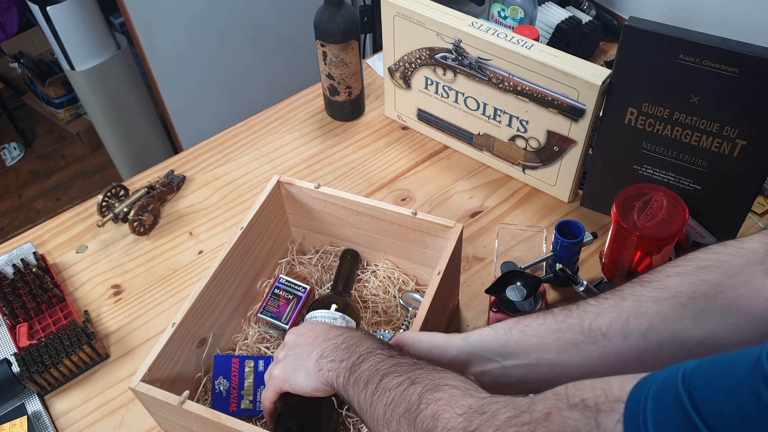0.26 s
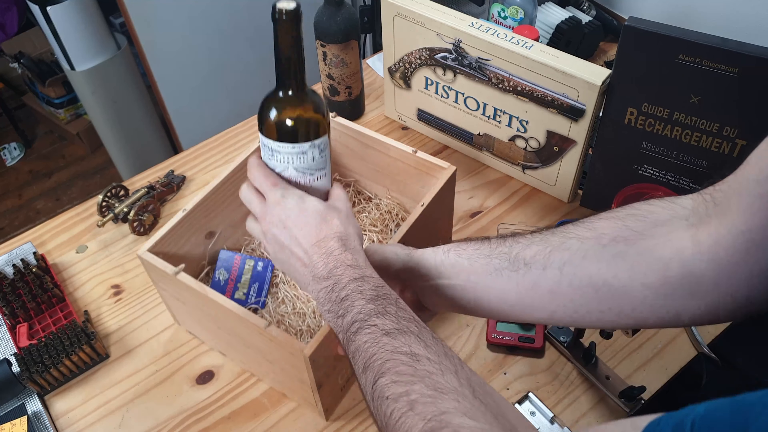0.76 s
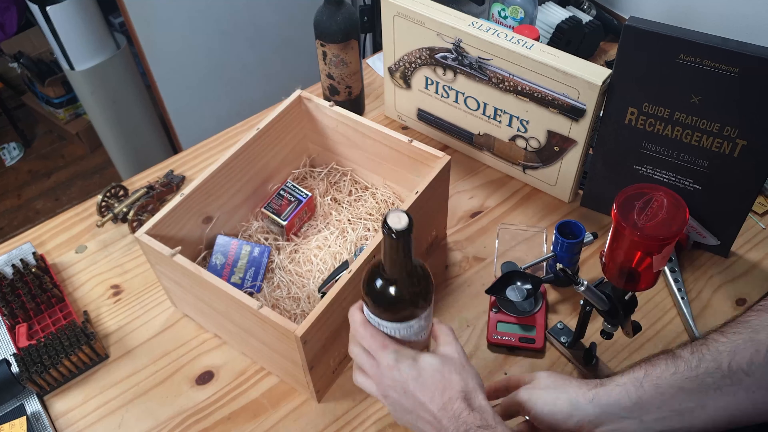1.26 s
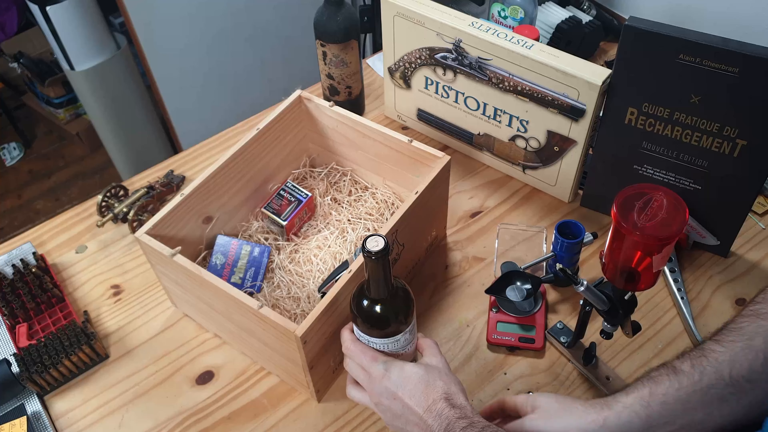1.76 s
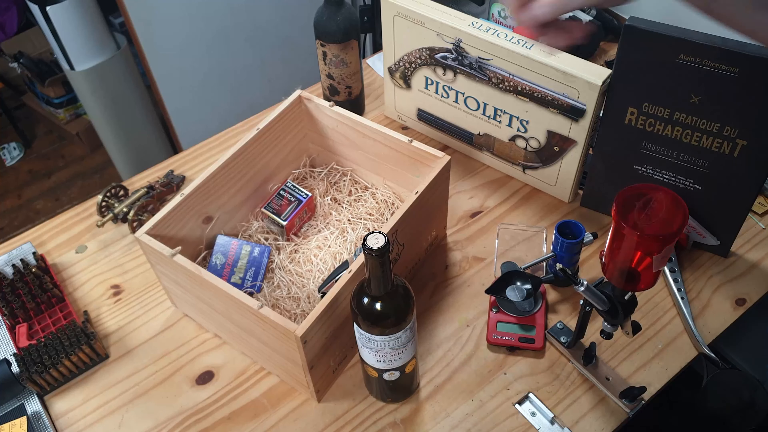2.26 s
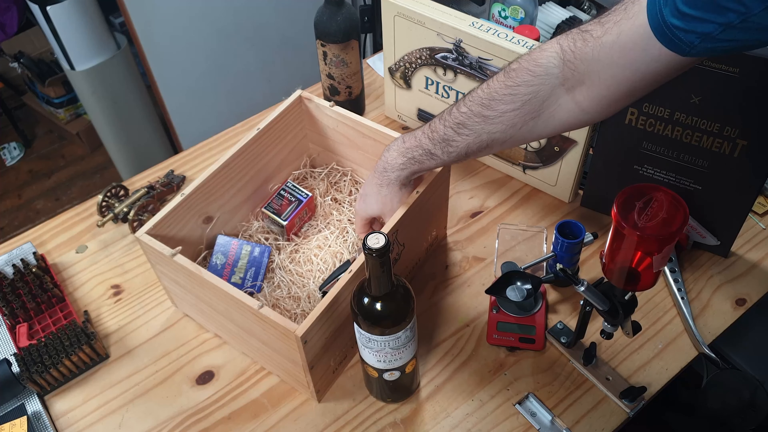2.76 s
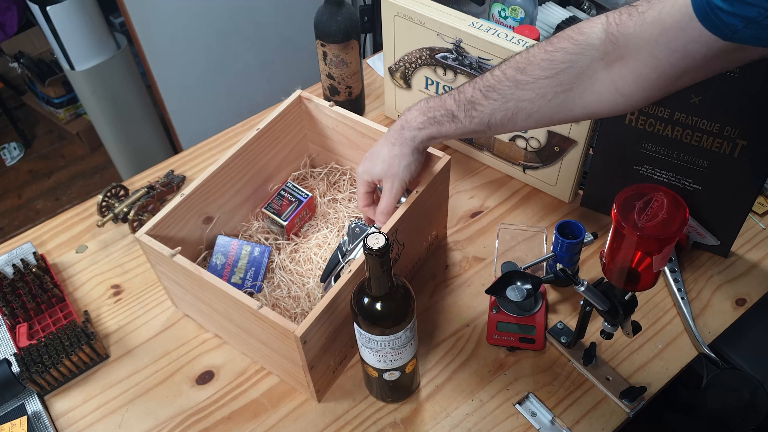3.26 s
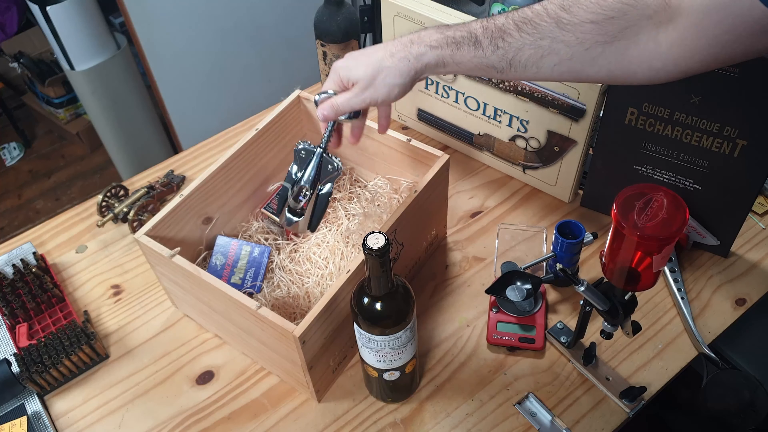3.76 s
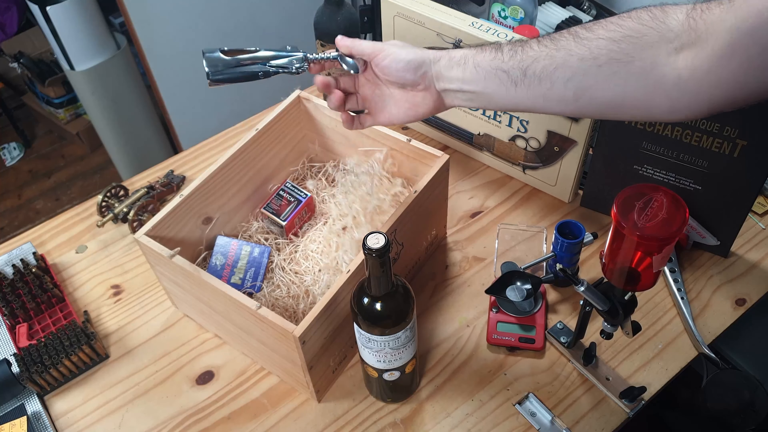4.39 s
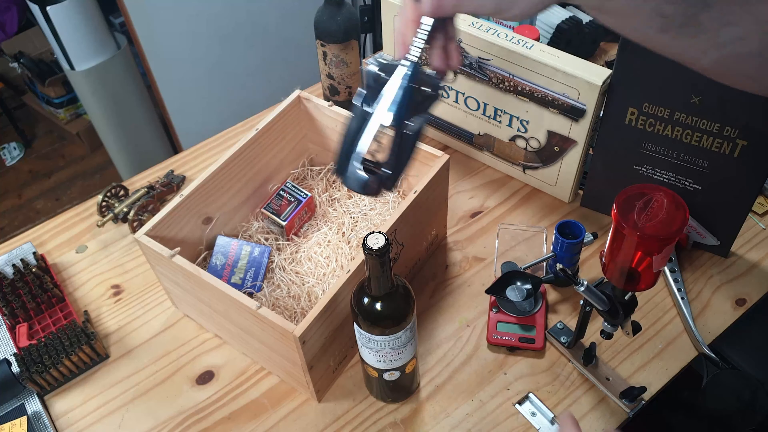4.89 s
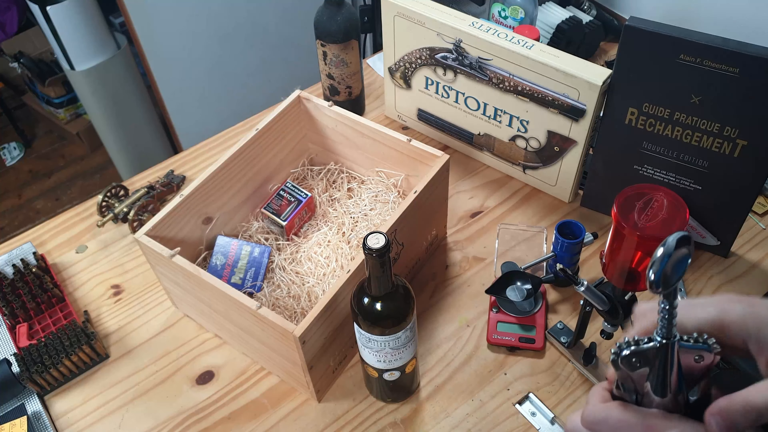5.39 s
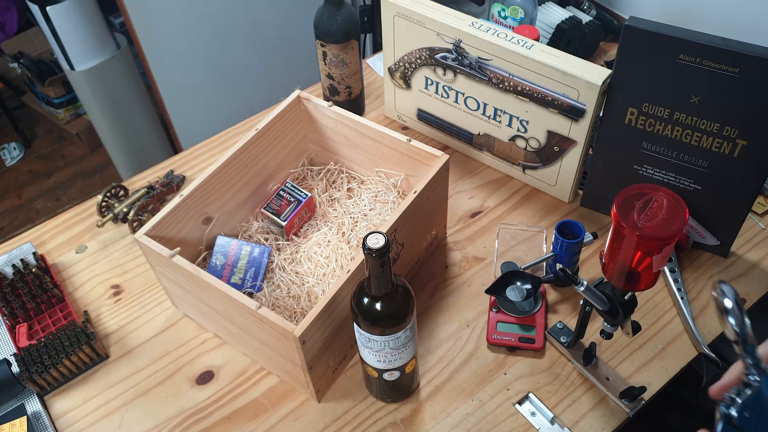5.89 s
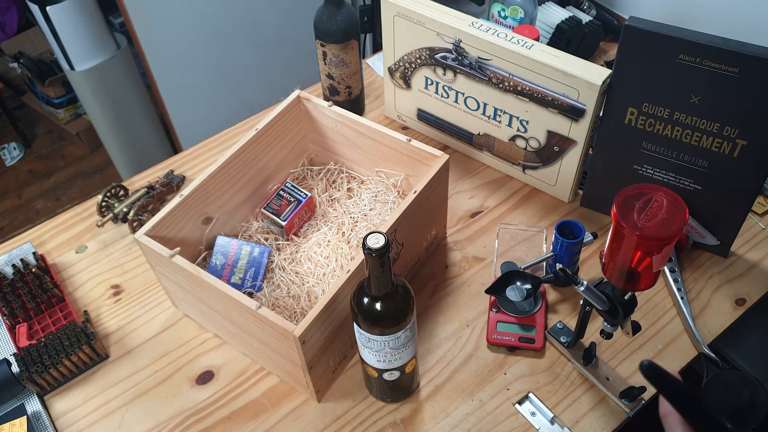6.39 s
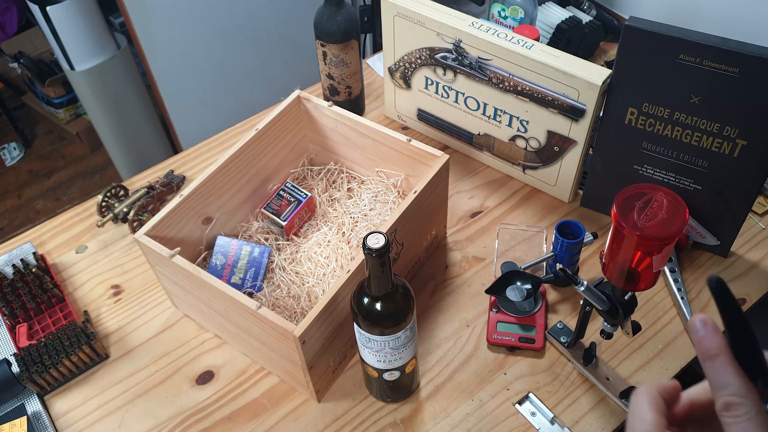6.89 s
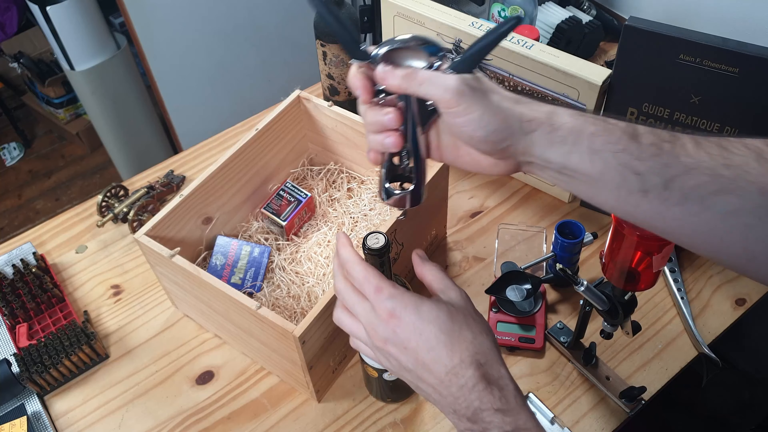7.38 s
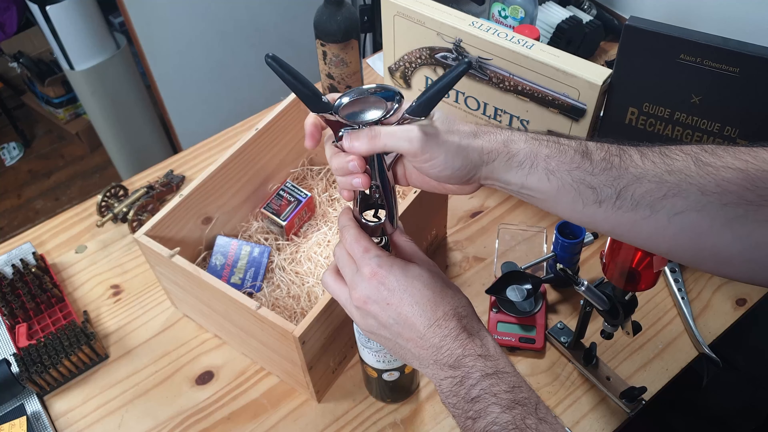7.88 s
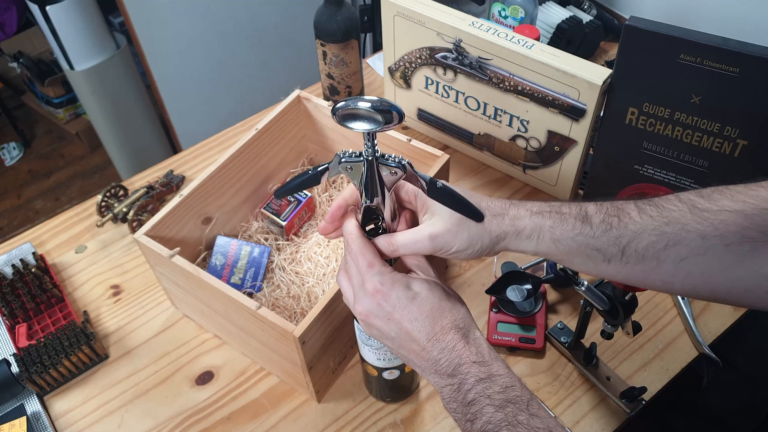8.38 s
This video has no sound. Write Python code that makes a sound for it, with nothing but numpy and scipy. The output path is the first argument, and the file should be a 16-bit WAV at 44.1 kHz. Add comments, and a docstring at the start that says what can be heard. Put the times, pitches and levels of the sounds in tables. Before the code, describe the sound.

A quiet small room with faint steady hiss, heard close in stereo, wood leaning left. From 0.2 s wood wool rustles; at 0.47 s a hard double knock rings the crate, followed by scraping, dense crackle and lesser knocks at 0.56 and 0.72 s, fading by 1.05 s. At 1.73 s the heavy bottle lands on the table in a tight, dull double thud, with a tiny settling touch at 1.92 s. From about 2.55 s a hand lightly stirs dry shavings; at 2.96 s metal bangs the crate, hollow and very loud. Soft brushing and trailing strands continue until 4.6 s. Small clicks begin near 4.94 s, then bright steel clacks and loose chatter crowd 5.3-6.2 s, peaking with a sharp double snap at 6.35 s and a lighter click at 6.6 s. After a pause, low bumps arrive at 7.65 s, then rattling clacks on the bottle from 8.08 to 8.4 s, fading out.

```python
"""A bottle is dragged rustling out of wood wool in a crate, knocks its wall and lands on a wooden table; a hand
stirs the wool, a winged metal corkscrew bangs the crate, then clacks as it is opened and fitted.
Knocks and clacks ring decaying modes plus scuff or chatter noise; skids excite single wooden resonances.
Wool and drag are random snaps and slips shaped in spectrum; bumps are low noise swells felt by the stand.
A short room tail, a brief airy hush and faint steady noise lie behind."""
import sys
import numpy as np
from scipy import signal
from scipy.fft import rfft, irfft, next_fast_len
from scipy.io import wavfile
from scipy.ndimage import uniform_filter1d

SR = 44100
rng = np.random.default_rng(int(sys.argv[2]) if len(sys.argv) > 2 else 0)


def generate_wav(signal):
    """Clip the signal to [-1, 1] and save it as 16-bit WAV at the path in sys.argv[1]."""
    frames = np.transpose(np.atleast_2d(signal))
    scaled = np.clip(frames, -1, 1) * 32767
    pcm = np.round(scaled).astype(np.int16)
    wavfile.write(sys.argv[1], SR, pcm)


def volts_from_decibels(level):
    """Turn decibel levels (scalar or array-like) into linear amplitude factors."""
    exponent = np.asarray(level, float) / 20
    return 10 ** exponent


N = 381465
PADDED = next_fast_len(N)
HZ = np.maximum(np.arange(PADDED // 2 + 1) * SR / PADDED, 10)
GAIN_GRID = np.arange(0, N, 32)   # samples at which swells are computed
BOTTLE_OUT_S = 1.1

# sounds on the table, channel balance: [f/Hz, left-right/dB]
NEAR_BALANCE = [(60, 3), (180, 1.5), (550, 8), (1650, 12.5), (4970, 15.5), (15000, 15)]
# bottle pulled out of the wool: [t/s, rustle/dB, drag on the boards/dB]
PULL = [(0.07, -80.5, -81), (0.27, -59, -62), (0.285, -63.5, -48), (0.39, -48, -45), (0.45, -41, -41),
        (0.49, -40.5, -23.5), (0.578, -38, -27), (0.806, -39.5, -34), (0.96, -51.5, -43),
        (1.02, -63.5, -53.5), (1.065, -77, -66.5), (1.2, -102, -100)]


def rms_one(x):
    """Scale to unit power."""
    return x / np.sqrt(np.mean(x ** 2) + 1e-20)


def in_time(rows):
    """Columns as sample-rate curves."""
    s, *columns = np.transpose(rows)
    return [np.interp(np.arange(N) / SR, s, c) for c in columns]


def at_hz(points):
    """Spectrum in dB at every bin, interpolated over log frequency."""
    hz, db = np.transpose(points)
    return np.interp(np.log(HZ), np.log(hz), db)


def sides(db):
    """Left and right gains for a level difference."""
    return volts_from_decibels(np.array([db / 2, -db / 2]))


def shaped(x, gain):
    """Multiply every frequency bin by a gain."""
    return irfft(rfft(x, PADDED) * gain, PADDED)[..., :N]


def add(out, s, x):
    """Mix a sound in at a time."""
    i = round(s * SR)
    out[..., i:i + x.shape[-1]] += x[..., :N - i]


def grains(per_s, spread_db):
    """Two trains of tiny random snaps of very uneven size."""
    sizes = volts_from_decibels(spread_db * np.minimum(rng.exponential(1, (2, N)), 5))
    signs = rng.choice([-1, 1], (2, N))
    return sizes * signs * (rng.random((2, N)) < per_s / SR)


def coloured(pair, spectrum, balance, alike):
    """Two unrelated signals become mid and side, shaped per frequency; rms of the middle is 1."""
    mid, side = rfft(pair, PADDED) * volts_from_decibels(at_hz(spectrum))
    alike = np.clip(alike, 0, 1)
    both = np.sqrt(1 + alike) * mid + np.sqrt(1 - alike) * side * [[1], [-1]]
    out = irfft(both * sides(balance), PADDED)[:, :N]
    return out / np.sqrt(np.mean(out.mean(axis=0) ** 2))


def ring(clicks, hz, t60):
    """Two-pole resonator: a unit click sets a sine of height 1 ringing."""
    r, w = volts_from_decibels(-60 / (t60 * SR)), 2 * np.pi * hz / SR
    return signal.lfilter([0, np.sin(w)], [1, -2 * r * np.cos(w), r * r], clicks + 1e-18)


def swells(s, db, t60, rise_db_per_s):
    """One gain curve per event: a climb to the peak, then a fade, both straight in dB."""
    late = GAIN_GRID / SR - s[:, None]
    return volts_from_decibels(db[:, None] + np.where(late < 0, rise_db_per_s * late, -60 * late / t60[:, None]))


def summed(gains):
    """Unrelated events add in power; back to the sample rate."""
    return np.interp(np.arange(N), GAIN_GRID, np.sqrt(np.sum(gains ** 2, axis=0)))


def knocks(events, modes, scuff_hz, top_hz, scuff_t60):
    """A soft contact rings the wood; a gripping hand shortens the ring; the surfaces scuff briefly."""
    panel_top_hz = 280             # modes below belong to the large panel
    panel_loaded_ring = 0.68       # share of its ring left while the bottle rests on it
    panel_touch_s, panel_touch_db_per_s = 3.27, 297   # the hand meets the wall and stills the panel
    wall_hz, wall_held_db = (380, 470), -6        # muffled while the bottle leans on the wall
    floor_hz, floor_loaded_db = (280, 380), 4.5   # the loaded floor answers more strongly
    out, t = np.zeros(N), np.arange(SR) / SR
    blow = np.exp(-2 * np.pi * 900 * t)
    scuff_band = signal.butter(1, [500, scuff_hz], "band", fs=SR, output="sos")
    scuff_top = signal.butter(2, top_hz, fs=SR, output="sos")
    for s, db, free, panel_db, scuff_db in events:
        bottle_in = s < BOTTLE_OUT_S
        touched_for_s = np.maximum(s + t - panel_touch_s, 0) * (s < panel_touch_s)
        stilled = volts_from_decibels(-panel_touch_db_per_s * touched_for_s)
        body = np.zeros(SR)
        for k, (hz, mode_db, t60) in enumerate(modes):
            panel = hz < panel_top_hz
            mode_db = mode_db + panel_db * panel
            if bottle_in:
                mode_db += wall_held_db * (wall_hz[0] < hz < wall_hz[1])
                mode_db += floor_loaded_db * (floor_hz[0] < hz < floor_hz[1])
            ring_t60 = t60 * free * (panel_loaded_ring if panel and bottle_in else 1)
            mode = volts_from_decibels(mode_db) * ring(blow, hz, ring_t60) * (-1) ** k
            body += mode * (stilled if panel else 1)
        scuff = signal.sosfilt(scuff_band, rng.standard_normal(SR))
        scuff = rms_one(signal.sosfilt(scuff_top, scuff))
        add(out, s, volts_from_decibels(db) * (body / np.abs(body).max() + scuff * volts_from_decibels(scuff_db - 60 * t / scuff_t60)))
    return out


def crate_knocks():
    """Blows on the crate wall ring its boards, with a bright short scuff."""
    # [t/s, body peak/dB, share of free ring time, large panel/dB, scuff re body peak/dB]
    blows = [(0.277, -33, 1, 6, -23.5), (0.414, -40.5, 0.65, 4.5, -25.5), (0.466, -6, 0.51, -20, -35.5),
             (0.4783, -9, 0.74, -14, -34), (0.556, -19.5, 1, -0.5, -29), (0.716, -23.5, 0.97, -7, -16.5),
             (2.956, -1, 0.8, -4.5, -20), (2.97, -6.5, 0.6, -10.5, -33), (3.334, -40.5, 0.52, -8, -13),
             (4.151, -62.5, 0.64, 0.5, -24), (4.498, -69, 0.94, 2.5, -17)]
    # crate modes: [f/Hz, relative level/dB, t60/s]
    modes = [(65.4, -30.5, 0.14), (123.44, -23.5, 0.22), (219.4, -13, 0.67), (340, -9, 0.11),
             (422.4, -6, 0.17), (600, -17.5, 0.09), (635, -7, 0.14), (802.5, -14.5, 0.05), (855, -18, 0.11),
             (947, -12.5, 0.08), (975, -24, 0.097), (1305, -23, 0.02), (1602, -17, 0.095),
             (1600, -26, 0.025), (2170, -30.5, .06)]
    return knocks(blows, modes, scuff_hz=15000, top_hz=20000, scuff_t60=0.058)


def table_landing():
    """The bottle lands and settles on the table: short low modes, with a dull scuff."""
    # [t/s, body peak/dB, share of free ring time, large panel/dB, scuff re body peak/dB]
    blows = [(1.7305, -6, 0.23, -4, -39.5), (1.744, -10, 0.84, 2, -25), (1.924, -41.5, 0.9, 14, -31)]
    # table modes: [f/Hz, relative level/dB, t60/s]
    modes = [(70, -20, 0.53), (129, -9, 0.24), (227.8, -3.5, 0.21), (280, -5.5, 0.2), (355.6, 0, 0.23),
             (439, 4.5, 0.042), (551, 2.5, 0.083), (635, -4.5, 0.11), (776, -3, 0.048), (845, -4.5, 0.049),
             (978, -12, .08), (1315, -12.5, 0.037), (1525, -16.5, 0.14)]
    return knocks(blows, modes, scuff_hz=760, top_hz=6500, scuff_t60=0.12)


def skids():
    """A hard edge skids along the boards: dense slips sing briefly through one wooden resonance."""
    # [start/s, length/s, level/dB, f/Hz]
    scrapes = [(0.176, 0.03, -66.5, 445), (0.176, 0.11, -70, 614), (0.487, 0.014, -40, 2700),
               (0.496, 0.028, -30.5, 340), (0.562, 0.035, -38.5, 2250), (0.719, .06, -30, 217),
               (0.643, .04, -35.5, 950), (0.65, 0.112, -43.5, 1910), (0.75, 0.064, -43, 1080),
               (3.25, .13, -48, 340), (3.303, 0.03, -54.5, 1070), (3.328, 0.057, -54, 600),
               (3.908, 0.063, -71.5, 636), (4.131, 0.046, -70, 643), (4.135, 0.042, -71.5, 970),
               (4.489, 0.075, -71, 441)]
    ring_cycles, edge_s = 22, 0.0097   # t60 in cycles; fade at either end
    tail_db, tail_fade_db_per_s = -13, 600
    out, t = np.zeros(N), np.arange(SR // 4) / SR
    for s, length, db, hz in scrapes:
        pressure = np.clip(np.minimum(t, length - t) / edge_s, 0, 1)
        tail = volts_from_decibels(tail_db - tail_fade_db_per_s * np.maximum(t - length, 0)) * (t > edge_s)
        slips = rms_one(ring(rng.standard_normal(len(t)) ** 3, hz, ring_cycles / hz))
        add(out, s, volts_from_decibels(db) * np.maximum(pressure, tail) * slips)
    return out


def corkscrew():
    """Each clack strikes the steel, one mode most, then the loose joint chatters to rest."""
    # joint blows: [t/s, level/dB, favoured mode f/Hz, its ring/dB, chatter above 8.5 kHz/dB]
    clacks = [(3.382, -54, 6030, -7, -8), (4.9424, -45, 5010, -22.5, -5), (5.027, -66, 6870, -6.5, -10.5),
              (5.1667, -50.5, 5920, -20.5, -9.5), (5.273, -56.5, 5880, -13, -12.5),
              (5.3084, -33.5, 5300, -15, -8), (5.3146, -27.5, 5010, -35, -5),
              (5.3831, -20, 5760, -21.5, -3), (5.455, -41.5, 4150, -12, -3), (5.4724, -33, 2875, -14, 0),
              (5.508, -37, 4760, -15, -1.5), (5.558, -42, 5800, -1, -9), (5.5671, -28.5, 4820, -24, -26.5),
              (5.578, -42.5, 3030, -15.5, -18), (5.638, -52.5, 4800, -10.5, -6),
              (5.722, -42.5, 4460, -20, -7), (5.8132, -50.5, 4430, -9, -5.5), (5.84, -32, 7080, -19, -19),
              (5.8511, -25, 4770, -29.5, -34), (5.908, -38, 9800, -11, -6), (5.9246, -20.5, 9980, -8, -23),
              (5.927, -40.5, 9500, -2, -21), (5.939, -24.5, 3270, -15, -17), (5.968, -34.5, 9850, -7, -2),
              (5.9804, -27.5, 4350, -22, -7), (6.0595, -40, 4000, -15.5, -2),
              (6.116, -43, 4360, -12.5, -18), (6.1266, -28, 5000, -15.5, -18.5),
              (6.1428, -24.5, 3860, -8.5, -4), (6.1564, -34, 3850, -38, -15.5),
              (6.1738, -26, 4900, -39, -0.5), (6.3513, -16.5, 4750, -20, -9.5),
              (6.3579, -11.5, 4780, -30, 0), (6.5987, -30, 4850, -10.5, -2),
              (6.616, -43.5, 4850, -11.5, -7), (7.645, -47, 6620, -30, 1.5), (7.696, -55.5, 3680, -6, -3.5),
              (7.7, -59.5, 4700, -14, 0), (7.8422, -44, 4370, -10, -14), (7.844, -55.5, 2840, -19, -10),
              (7.9314, -54, 2875, -16.5, 3), (7.935, -59, 4580, -14, -3.5), (8.084, -24, 4020, -26, 3),
              (8.1123, -40.5, 4760, -19, 5), (8.18, -25.5, 4770, -19.5, 1.5), (8.264, -23, 4830, -40, 0),
              (8.2837, -17.5, 4880, -35, -7), (8.3419, -25, 3720, -22, -11.5), (8.3813, -26, 4500, -34, 6),
              (8.407, -35, 2610, -5, -4), (8.36, -27, 3500, -22, -8), (8.613, -62.5, 2670, -1.5, -8.5)]
    # steel modes: [f/Hz, level/dB, t60/s]
    steel_modes = [(2790, -47.5, 0.06), (2920, -28, 0.0345), (3850, -61.5, 0.064), (4358, -54, .07),
                   (4700, -36, 0.054), (4850, -47.5, .1), (4850, -51, 0.049), (5700, -44, 0.08),
                   (7400, -42.5, .04), (6520, -29, 0.015), (9850, -34, 0.07), (9120, -40.5, .05),
                   (10700, -53.5, .1), (13950, -42.5, .08)]
    # full bottle under the frame: [f/Hz, level/dB, t60/s]
    bottle_modes = [(300, -31, 0.078), (653, -23.5, 0.046), (1027, -28, 0.041), (1300, -29.5, 0.037)]
    # chatter spectrum: [f/Hz, density/dB]
    rattle = [(300, -30), (700, -28), (1300, -23.5), (2250, -15.5), (3000, -13), (4600, -8.5), (7000, -7),
              (9000, -9.5), (12000, -19.5), (16000, -21.5)]
    # steel, channel balance: [f/Hz, left-right/dB]
    steel_balance = [(60, -5.5), (180, -8.5), (550, 8), (1650, 10), (4970, 13.5), (9800, 2.5), (13000, 14)]
    # the harder the blow, the sooner the joint seats: t60 at -27 dB, factor per 10 dB weaker
    chatter_t60_s, chatter_per_10_db = 0.084, 1.25
    chatter_db, chatter_rise_s = -15.0, 0.0018
    detune = 0.008      # loose parts sit differently at each blow
    broad_db = -16      # broad swell round the favoured mode
    feed_share = 0.86   # share of the chatter time that feeds the favoured mode
    seated_s, gripped_s = 8.0, 8.15   # frame on the bottle neck; frame grips it
    neck_ring = (2690, -29, 0.07)     # gained on gripping: Hz, dB, t60 s
    grip_snap_db = -16                # only harder blows reach the plastic grips
    handle_hz, handle_db, handle_t60_s = 740, -28.5, 0.046   # dull mode of the grips

    out, t = np.zeros((2, N)), np.arange(SR // 4) / SR
    noise = coloured(grains(8000, 3.2), rattle, 0 * HZ, 0.2)
    top = signal.sosfilt(signal.butter(4, 8500, "high", fs=SR, output="sos"), noise)
    for s, db, favoured_hz, ring_db, top_db in clacks:
        t60 = chatter_t60_s * chatter_per_10_db ** ((-27.0 - db) / 10)
        i = round(s * SR)
        part = t[:N - i]
        span = slice(i, i + len(part))
        chatter = (noise - top)[:, span] + volts_from_decibels(top_db) * top[:, span]
        chatter = chatter * volts_from_decibels(chatter_db - 60 * part / t60) * np.minimum(part / chatter_rise_s, 1)
        touches = 0.68 * (part == 0) + 0.5 * chatter   # the chatter keeps feeding the modes
        steel = 0
        for hz, mode_db, decay in steel_modes:
            chance, shift = rng.normal(0, 1, 2)   # every contact point wakes other modes
            steel = steel + volts_from_decibels(mode_db + 5 * chance) * ring(touches, hz * (1 + detune * shift), decay)
        if s > seated_s:
            for hz, mode_db, decay in bottle_modes + [neck_ring] * (s > gripped_s):
                steel = steel + volts_from_decibels(mode_db + rng.uniform(-5, 11.6)) * ring(touches, hz, decay)
        if db > grip_snap_db:
            steel = steel + volts_from_decibels(handle_db) * ring(touches, handle_hz, handle_t60_s)
        feed = touches * volts_from_decibels(-60 * part / t60 * (1 / feed_share - 1))
        favoured = ring(feed, favoured_hz, 0.018)
        chatter = chatter + volts_from_decibels(broad_db) * ring(chatter, favoured_hz, 0.0013)
        add(out, s, volts_from_decibels(db) * (steel + volts_from_decibels(ring_db) * favoured + chatter))
    return shaped(out, sides(at_hz(steel_balance)))


def scraped(per_s, spread_db, woody):
    """Slips of a dragged thing, partly heard through the modes of the thin wall."""
    # thin board that a drag wakes: [f/Hz, level/dB, t60/s]
    side_wall = [(416, -2, 1), (672.3, 0, 0.065), (962, -5, 0.19), (1075, 0, 0.038), (1310, -1.5, 0.064),
                 (1671, -1.5, 0.17), (1940, -4, 0.14)]
    slips = grains(per_s, spread_db)
    wall = sum(volts_from_decibels(db) * ring(slips, hz, t60) for hz, db, t60 in side_wall)
    return rms_one(slips) + woody * rms_one(wall)


def wool():
    """Shavings crackle densely; what is pulled through them drags on the boards."""
    # hand stirs the wool, then strands trail from the corkscrew: [t/s, crisp top/dB]
    stir = [(2.4, -88), (2.544, -73), (2.63, -91), (2.658, -60), (2.816, -63), (2.98, -48.5), (3.06, -54.5),
            (3.216, -55), (3.35, -65.5), (3.44, -59.5), (3.662, -67), (3.794, -59), (3.942, -62.5),
            (4.026, -58.5), (4.144, -56.5), (4.22, -63), (4.3, -87), (4.382, -61.5), (4.448, -59.5),
            (4.5, -57.5), (4.632, -86)]
    # hand or corkscrew brushes the wall through the wool: [t/s, drag/dB, rustle/dB, fade t60/s]
    brushes = [(2.658, -66, -57, 0.78), (2.854, -61, -55, 1), (2.93, -50, -51, 1), (2.973, -47, -65, 0.66),
               (3.27, -66, -57.5, 0.5), (3.322, -62, -52.5, 0.22), (3.92, -70.5, -62.5, 0.34),
               (4.11, -65.5, -59.5, 0.44), (4.155, -58, -63, 0.24), (4.486, -66.5, -56, 0.24)]
    # rustle spectrum: [f/Hz, density/dB]
    rustle_spectrum = [(900, -38), (2000, -13.5), (3300, -16.5), (4500, -14), (6500, -16.5), (8500, -19),
                       (10000, -40)]
    # crisp top spectrum: [f/Hz, density/dB]
    crisp_spectrum = [(7000, -32.5), (9000, -6), (12000, -3), (16000, -5.5)]
    # strands with nothing pressing on them: [f/Hz, density/dB]
    loose_spectrum = [(2200, -20.5), (4000, -10.5), (5500, -5), (7500, -4), (9500, -20.5)]
    # drag spectrum: [f/Hz, density/dB]
    drag_spectrum = [(300, -39.5), (500, -7), (900, -9.5), (1400, -11), (2200, -16.5), (3000, -15.5),
                     (4500, -38)]
    # left-right likeness: [f/Hz, likeness 0..1]
    likeness = [(60, 0.14), (180, 0.28), (550, 1), (1650, 0.1), (4970, 0.052), (15000, 0.01)]
    pull_crisp_db, stir_rustle_db = -8, -2   # crisp re pull rustle; loose rustle re stir crisp
    brush_rise_db_per_s = 899.5

    pull_db, pull_drag_db = in_time(PULL)
    stir_db, = in_time(stir)
    s, drag_db, rustle_db, t60 = np.transpose(brushes)
    rustle = volts_from_decibels(pull_db) + summed(swells(s, rustle_db, t60, brush_rise_db_per_s))
    crisp = volts_from_decibels(pull_db + pull_crisp_db) + volts_from_decibels(stir_db)
    drag = volts_from_decibels(pull_drag_db) + summed(swells(s, drag_db, t60, brush_rise_db_per_s))
    near, alike = at_hz(NEAR_BALANCE), at_hz(likeness)
    loose = volts_from_decibels(stir_db + stir_rustle_db) * coloured(grains(6000, 3.2), loose_spectrum, near, 0.06)
    # snaps come in bunches
    clumps = volts_from_decibels(1.7 * rms_one(uniform_filter1d(rng.standard_normal(N), size=1300)))
    snaps = grains(12000, 1.9) * clumps
    # the heavy bottle damps the wall
    woody = np.where(np.arange(N) < BOTTLE_OUT_S * SR, 0.2, 0.9)
    slips = scraped(1500, 2.5, woody)
    return (loose + rustle * coloured(snaps, rustle_spectrum, near, alike)
            + crisp * coloured(snaps, crisp_spectrum, near, alike)
            + drag * coloured(slips, drag_spectrum, near, alike))


def bumps():
    """Weight shifts shake the stand near its own low pitch and set the boards murmuring."""
    # carried by table and stand: [t/s, thud/dB, boards/dB, thud left-right/dB, fade t60/s]
    jolts = [(0.56, -51.5, -53, -8, 0.71), (1.752, -35, -35.5, 5.5, 0.57), (2.04, -50, -86, -4, 0.95),
             (2.499, -56.5, -68, -16, 1.5), (2.621, -61, -62, -7.5, 0.82), (2.979, -43.5, -43.5, -3, 0.88),
             (3.26, -69, -48.5, -8, 0.58), (3.33, -62, -46, -5, 0.15), (5.831, -52, -62, -32.5, 1.1),
             (5.975, -50.5, -59, -36.5, 0.42), (6.32, -76.5, -76, -15, 0.26), (7.651, -44, -50.5, -1, 0.35),
             (7.686, -35, -47, -9, 0.23), (7.77, -47, -61, -18, 0.27), (7.94, -64, -75, -5, 0.98),
             (8.188, -41.5, -53.5, -4, 4.7), (8.273, -31.5, -37.5, 2, 0.45),
             (8.407, -36.5, -40.5, -9, 0.31), (8.55, -50.5, -78, -12, 1)]
    # slow weight shifts between the bumps: [t/s, thud/dB, boards/dB]
    sway = [(0, -70, -79), (.25, -71, -70), (.5, -54, -80), (1.15, -72.5, -75.5), (1.65, -65.5, -81.5),
            (2.35, -71.5, -73.5), (3.63, -67, -74.5), (3.77, -61, -75.5), (4.08, -57, -76),
            (4.26, -63, -78.5), (4.4, -72.5, -83.5), (4.8, -92, -82), (4.9, -88.5, -73), (5.73, -82, -80.5),
            (6.5, -82, -91), (7.4, -71.5, -66.5), (7.6, -66.5, -81), (8.1, -67.5, -75.5)]
    # thud spectrum: [f/Hz, density/dB]
    thud_spectrum = [(12, -42.5), (30, -22), (52, -5.5), (66, 0), (82, -10), (110, -14), (160, -22),
                     (260, -49.5), (440, -80.5)]
    # board murmur spectrum: [f/Hz, density/dB]
    boards_spectrum = [(90, -17), (150, -2.5), (280, -0.5), (450, -11.5), (700, -24), (1200, -54.5)]
    rise_db_per_s, pull_boards_db = 799, -2   # board murmur re pull drag
    s, thud_db, boards_db, pan_db, t60 = np.transpose(jolts)
    sway_db, murmur_db = in_time(sway)
    _, pull_drag_db = in_time(PULL)
    shakes = swells(s, thud_db, t60, rise_db_per_s)
    thud = np.array([np.hypot(volts_from_decibels(sway_db), summed(shakes * side[:, None])) for side in sides(pan_db)])
    boards = np.hypot(volts_from_decibels(murmur_db), summed(swells(s, boards_db, t60, rise_db_per_s)))
    boards = np.hypot(boards, volts_from_decibels(pull_drag_db + pull_boards_db))
    return (thud * coloured(grains(400, 4.3), thud_spectrum, 0 * HZ, 0.33)
            + boards * coloured(grains(1200, 3.3), boards_spectrum, at_hz(NEAR_BALANCE), 0.84))


def room(x):
    """A dense decaying tail, unrelated in the two channels, starting after the first bounce."""
    t60_s, level_db, first_bounce_s = 0.22, -6, 0.004
    t = np.arange(SR // 2) / SR
    tail = rng.standard_normal((2, len(t))) * volts_from_decibels(-60 * t / t60_s) * (t > first_bounce_s)
    band = signal.butter(1, [450, 12000], "band", fs=SR, output="sos")   # a thin tail with little bass
    tail = signal.sosfilt(band, tail)
    tail = tail / np.sqrt(np.sum(tail ** 2) / 2)
    return volts_from_decibels(level_db) * signal.fftconvolve(x, tail, axes=1)[:, :N]


def hush():
    """A faint airy noise band dies away as the bottle starts to move."""
    # [f/Hz, density/dB]
    hush_band = [(1100, -30.5), (1600, -5.5), (2100, 4.5), (2600, -13), (3600, -34)]
    start_db, hold_s, fade_db_per_s = -68.5, 0.23, 149
    level_db = start_db - fade_db_per_s * np.maximum(np.arange(N) / SR - hold_s, 0)
    return volts_from_decibels(level_db) * coloured(rng.standard_normal((2, N)), hush_band, -4 + 0 * HZ, 0.1)


def quiet_air():
    """Steady shaped noise, nearly unrelated in the two channels."""
    # [f/Hz, density/dB]
    air_spectrum = [(20, -23.5), (60, -4), (130, -13.5), (280, -12.5), (450, -15.5), (1200, -19.5),
                    (1800, -19.5), (2250, -15.5), (2800, -23), (5000, -29), (8000, -32.5), (11000, -27.5),
                    (14000, -25.5), (16000, -27)]
    # [f/Hz, left-right/dB]
    air_balance = [(60, -0.5), (180, -6.5), (550, 0.5), (1650, -7.5), (4970, -2.5), (15000, 0)]
    level_db = -70.5
    return volts_from_decibels(level_db) * coloured(rng.standard_normal((2, N)), air_spectrum, at_hz(air_balance), 0.1)


def scene():
    """Wood is heard left of centre, more so in the treble; only struck and skidding things feed the room."""
    wood = crate_knocks() + table_landing() + skids()
    struck = shaped(wood, sides(at_hz(NEAR_BALANCE))) + corkscrew()
    return struck + room(struck) + wool() + bumps() + hush() + quiet_air()


def low_pass(x):
    """Removes everything above the highest recorded frequency."""
    return signal.sosfilt(signal.butter(12, 16440, fs=SR, output="sos"), x)


def record(dry):
    """The microphone dips near 8.6 kHz and falls off above 15.6 kHz; tanh rounds off the loudest peaks."""
    # microphone response: [f/Hz, gain/dB]
    response = [(6800, -0.5), (8600, -9.5), (10500, -1.5), (15600, 2.5), (16200, -31)]
    heard = shaped(dry, volts_from_decibels(at_hz(response)))
    mix = 1.086 * np.tanh(heard / 1.105)
    return low_pass(mix)


dry = scene()
out = record(dry)
generate_wav(out)
```